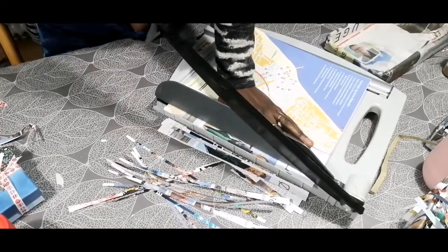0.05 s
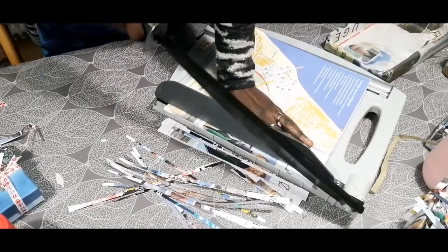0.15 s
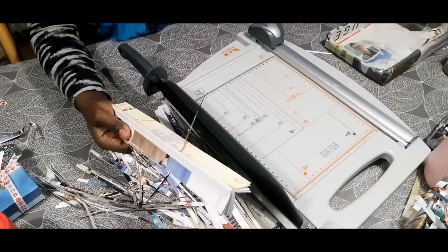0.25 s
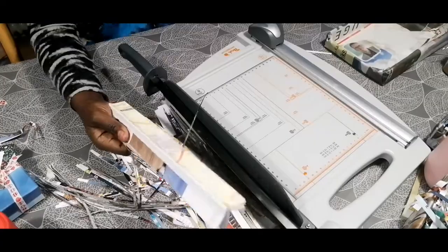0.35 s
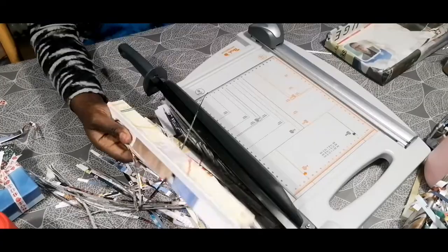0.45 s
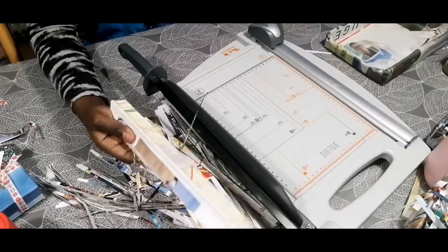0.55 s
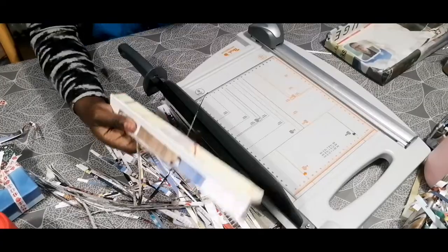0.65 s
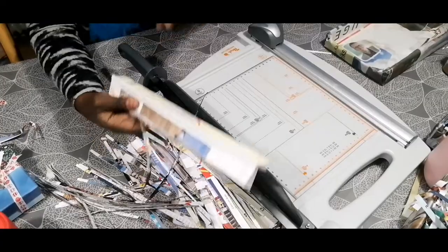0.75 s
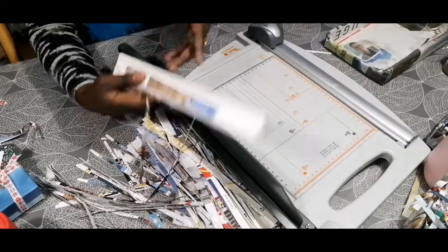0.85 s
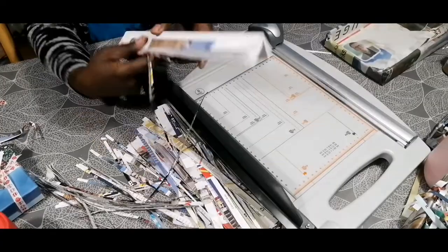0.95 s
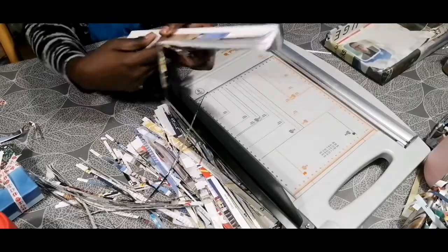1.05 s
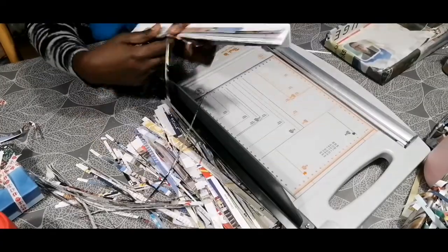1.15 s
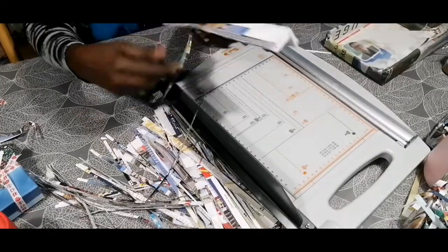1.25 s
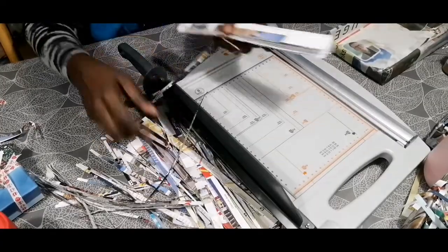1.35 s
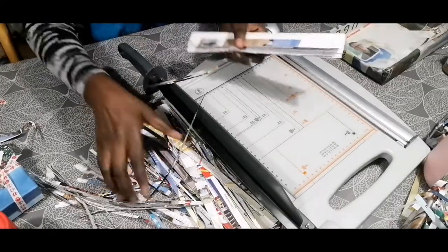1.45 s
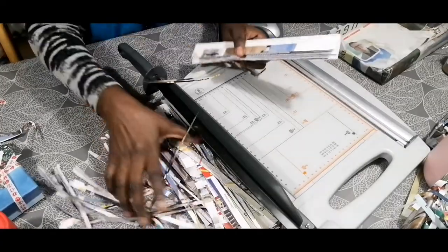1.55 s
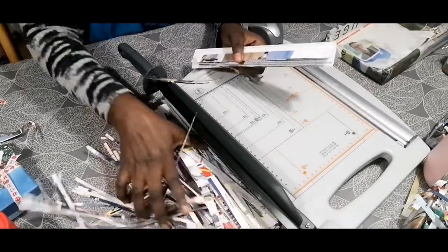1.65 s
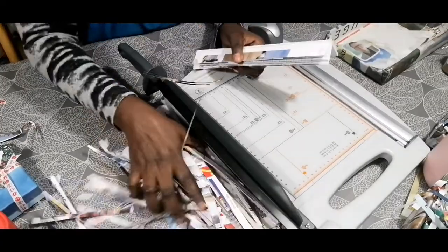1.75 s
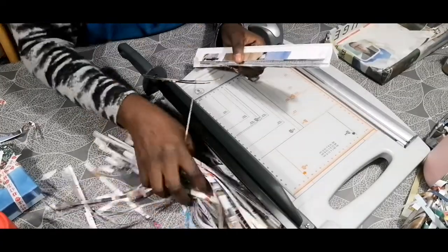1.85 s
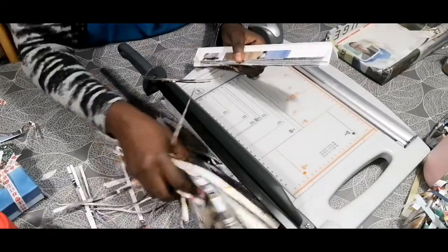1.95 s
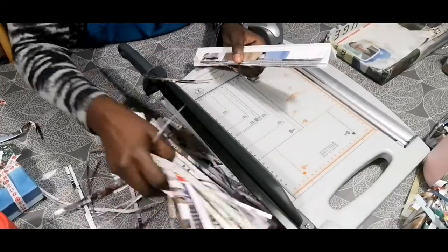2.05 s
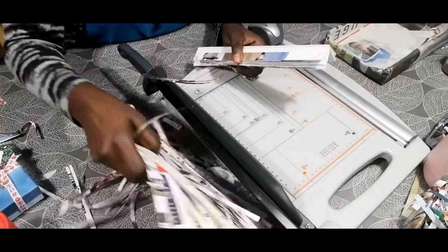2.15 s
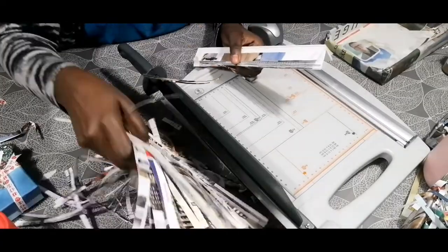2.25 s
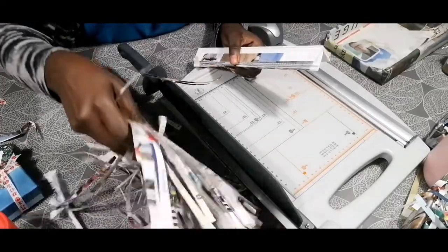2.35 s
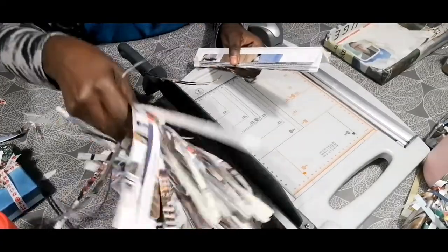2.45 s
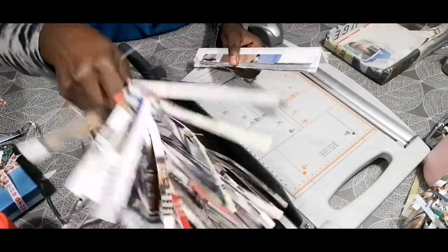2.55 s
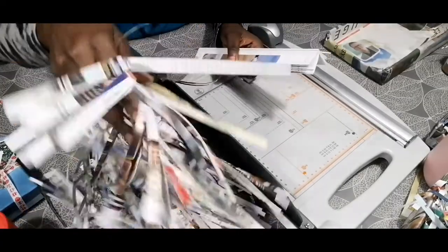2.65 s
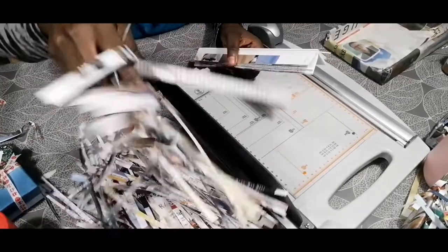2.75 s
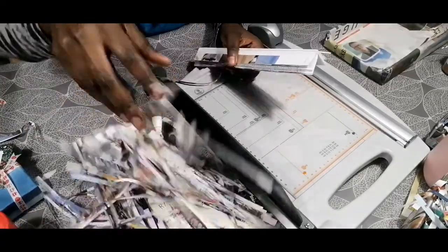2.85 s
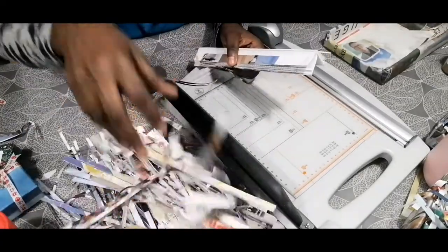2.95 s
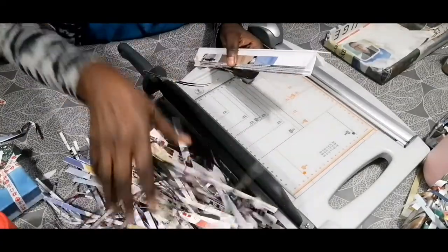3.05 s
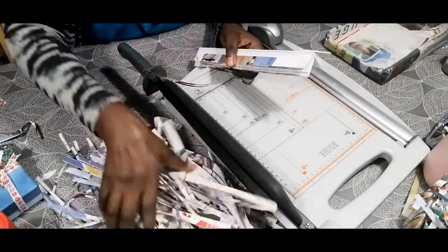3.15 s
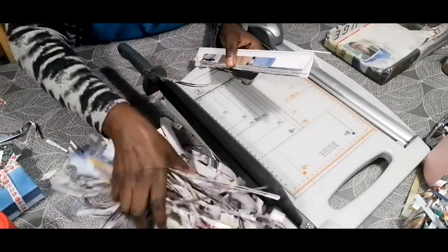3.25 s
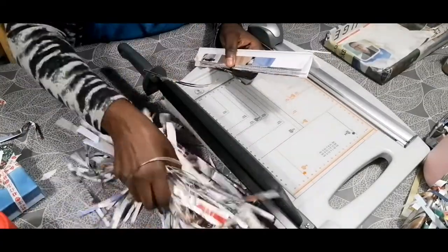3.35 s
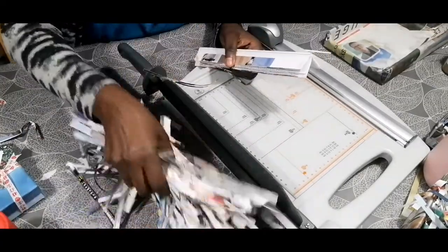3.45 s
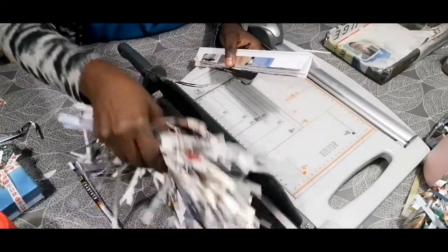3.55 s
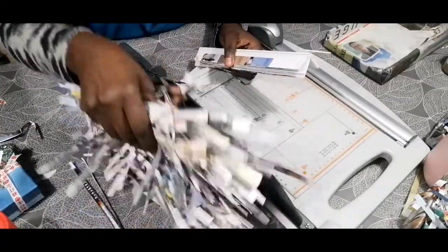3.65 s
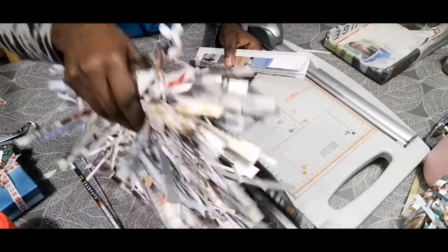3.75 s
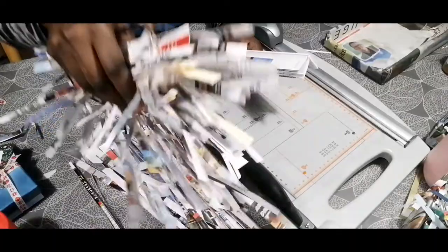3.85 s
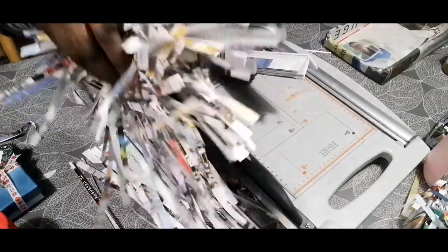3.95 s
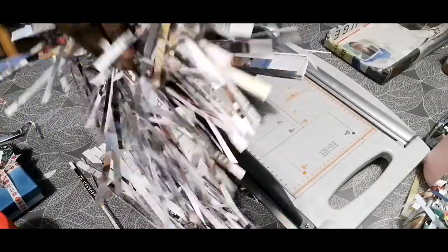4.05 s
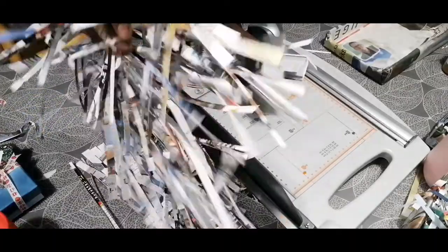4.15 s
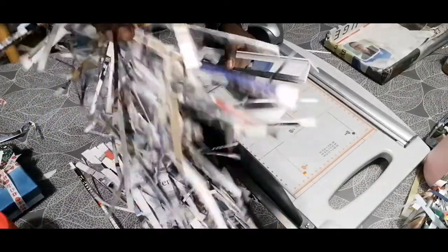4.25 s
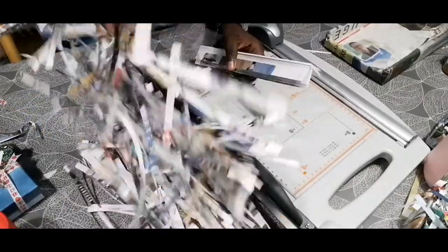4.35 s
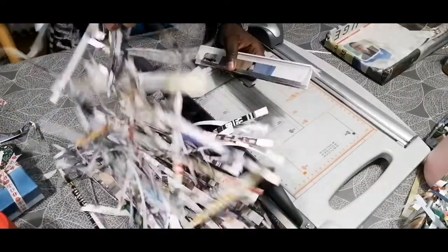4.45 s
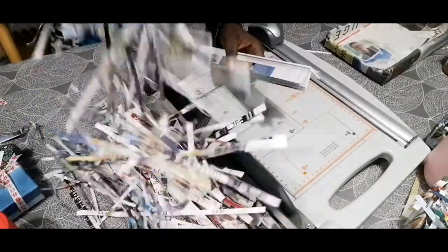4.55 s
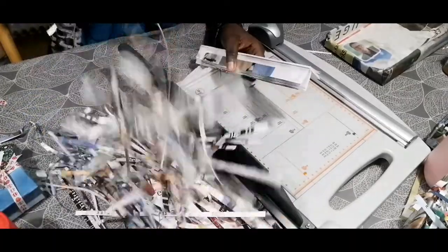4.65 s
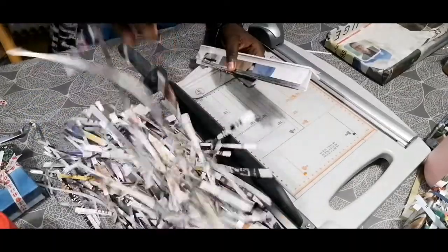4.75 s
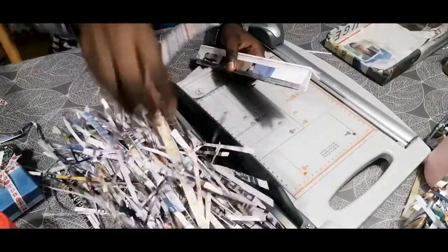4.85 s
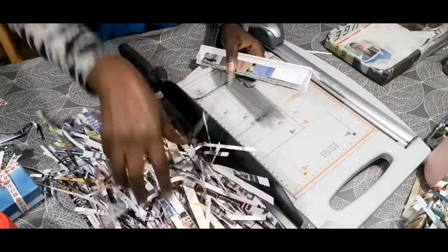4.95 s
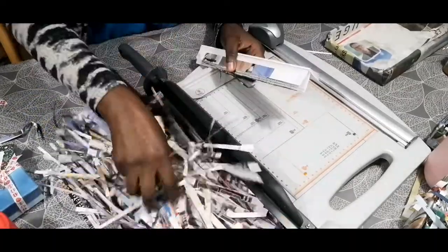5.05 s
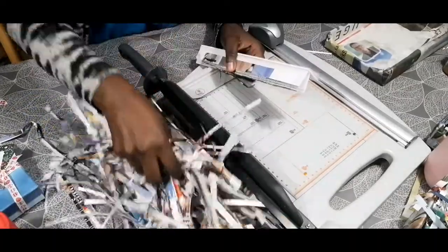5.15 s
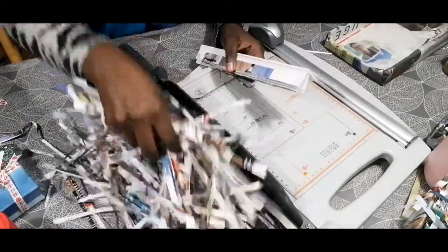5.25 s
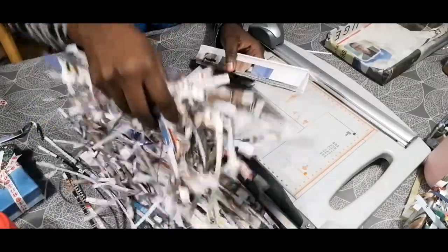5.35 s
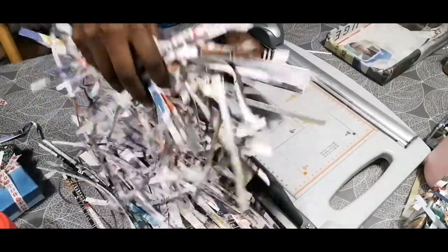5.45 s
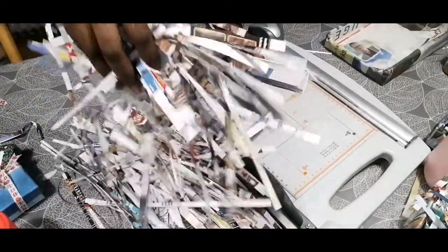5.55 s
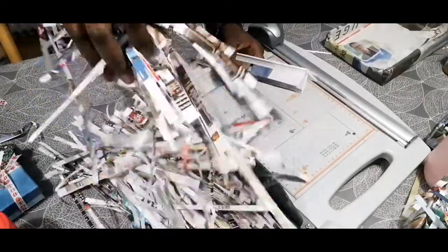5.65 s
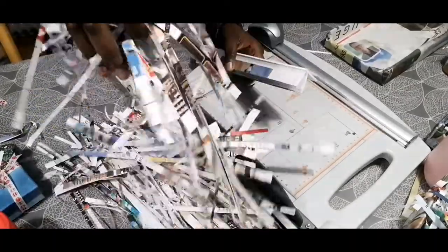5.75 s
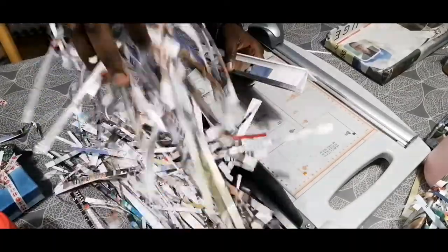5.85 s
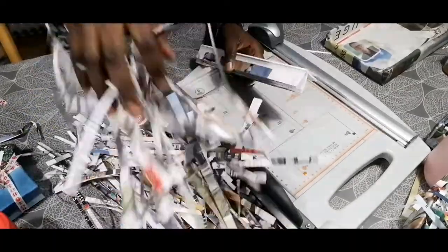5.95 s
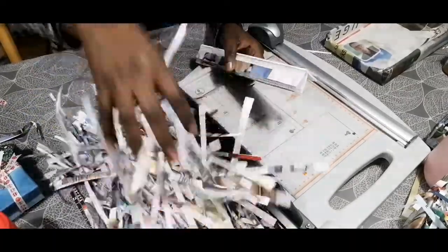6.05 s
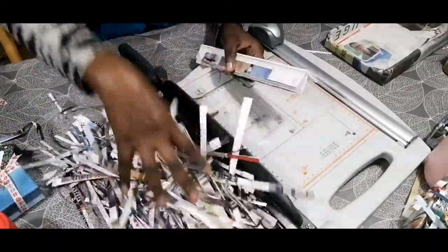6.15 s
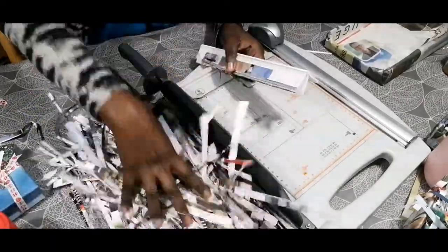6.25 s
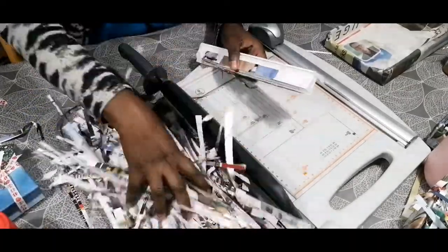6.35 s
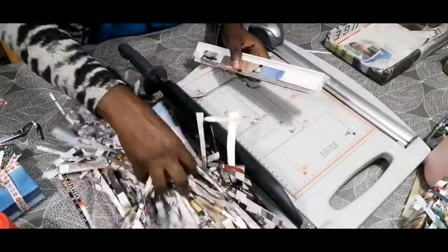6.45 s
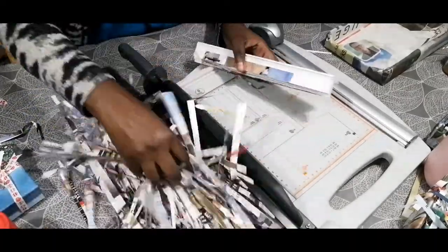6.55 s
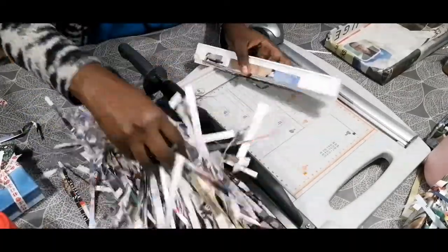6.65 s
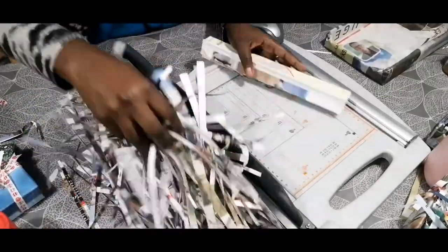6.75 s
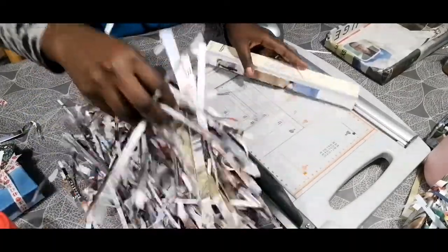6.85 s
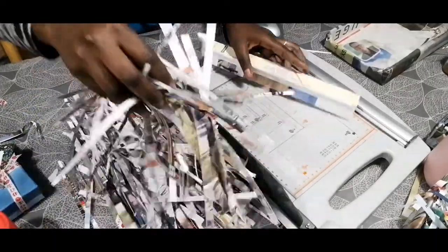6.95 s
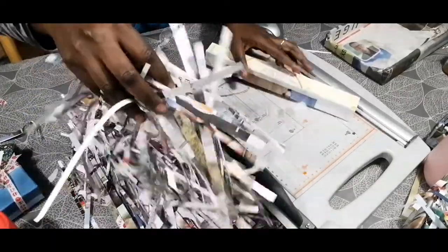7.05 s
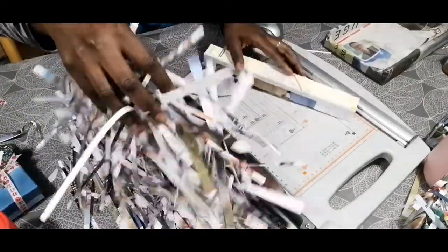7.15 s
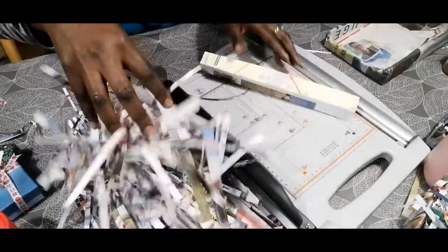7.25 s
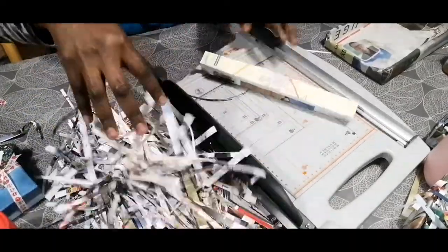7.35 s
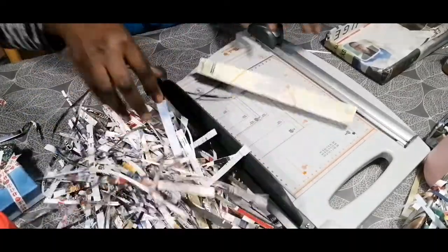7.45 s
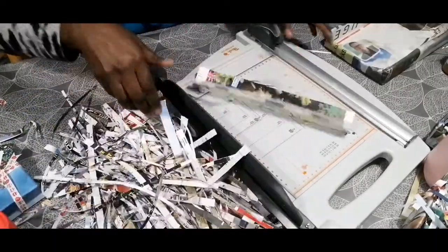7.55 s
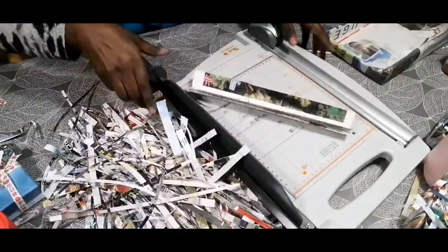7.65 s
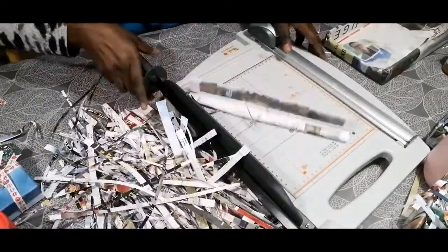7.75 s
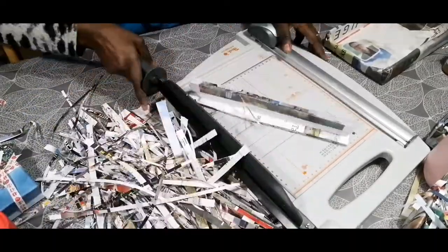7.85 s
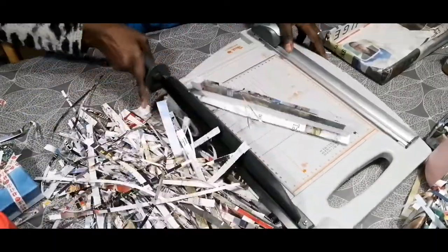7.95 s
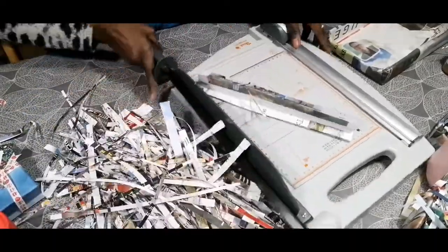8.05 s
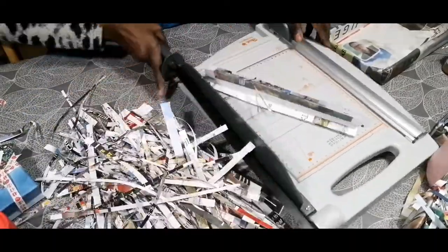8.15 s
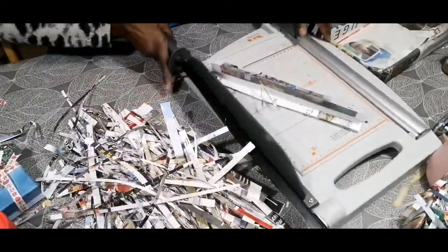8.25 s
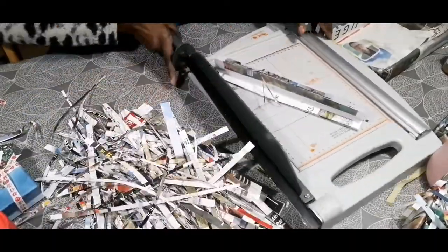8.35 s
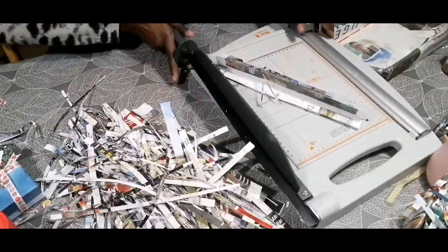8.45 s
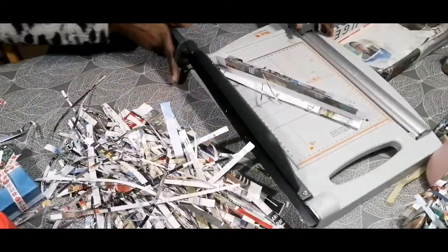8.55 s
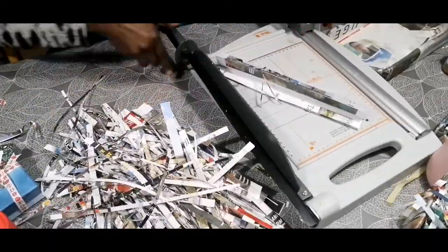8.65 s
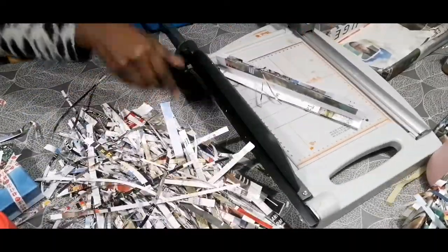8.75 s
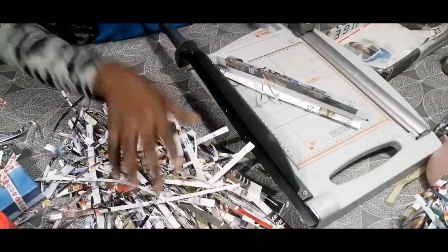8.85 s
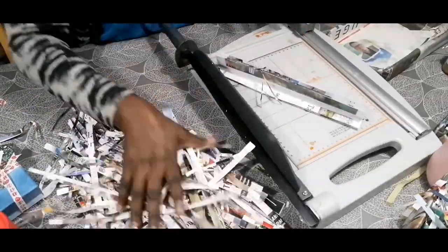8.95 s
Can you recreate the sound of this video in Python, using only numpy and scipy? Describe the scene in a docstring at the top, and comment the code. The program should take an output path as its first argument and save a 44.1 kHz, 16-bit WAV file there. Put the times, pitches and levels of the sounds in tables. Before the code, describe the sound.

A lever paper cutter crunches through a stack of magazine pages in one short, juddering stroke. Pages shift and a hand bumps the table. The cut strips are then gathered, lifted and dropped in repeated handfuls, with bright crinkling, sharp cracks and soft taps. Near the end the cutter is knocked and rings briefly, and a bundle of pages slaps down and slides. It is heard close up in a small, quiet room.

```python
"""A lever paper cutter on a cloth-covered table in a small room. First the blade shears a stack of
magazine pages: fibres tear, slips and jerks shake the bed. Pages shift; a hand bumps the table.
From 1.5 s the offcut strips are gathered, lifted and dropped in handfuls, buckling in clicks,
rubbing, and landing with soft taps. At 7.5 s the cutter is knocked and rings; at 7.9 s a bundle
of pages slaps onto its bed and slides. The paper gives sharp cracks throughout."""
import sys
import numpy as np
from scipy import signal
from scipy.fft import rfft, irfft
from scipy.io import wavfile

SR = 44100
rng = np.random.default_rng(int(sys.argv[2]) if len(sys.argv) > 2 else 0)


def int16_out(signal):
    """Quantize to a 16-bit WAV file."""
    q = np.round(np.clip(np.atleast_2d(signal).T, -1, 1) * 32767)
    wavfile.write(sys.argv[1], SR, q.astype(np.int16))


N = 397341
TIME = np.arange(N) / SR


# cutter bed and arm modes: f/Hz, level/dB, t60/s
CUTTER_MODES = [(110.8, -2.5, 0.45), (152, 2, 0.32), (198, -3, 0.43), (270.2, 0, 1), (317.4, 1.5, 0.047),
                (376.7, 4, 0.58), (413, -8, 0.87), (493, -22, .2), (551, -15, 0.9), (601, -10, 0.34),
                (653, -8.5, 0.34), (715, -2.5, 0.2), (756, -8, 0.26), (876, -7, 0.22), (941, -3, 0.5),
                (987, -4.5, 0.057), (1147, -7, 0.2), (1194, -3.5, 0.2), (1390, -16, .3), (1993, -9, 0.1)]
# blade in the stack: t/s, judder/dB, tearing/dB
BLADE_STROKE = [(0.08, -41.5, -54.5), (0.124, -39, -55), (0.2, -36, -50.5), (0.26, -33, -44.5),
                (0.33, -29.5, -49.5), (0.39, -30, -40.5), (0.47, -30.5, -54)]
# blade jerks through a few sheets: t/s, level/dB, low/Hz, high/Hz, t60 factor
BLADE_JERKS = [(0.07, -42, 330, 870, .5), (0.124, -31, 130, 448, 0.3), (0.158, -36.5, 400, 1300, .15),
               (0.186, -34, 650, 1020, .12), (.209, -42, 130, 400, .2), (0.23, -34, 403, 1210, .15),
               (0.273, -31, 130, 500, .2), (0.310, -23, 170, 1200, 0.12), (.333, -30.5, 130, 420, .15),
               (.367, -24, 220, 1010, .2), (0.4, -26.5, 150, 1000, .12), (0.408, -18, 220, 500, 0.13),
               (0.433, -20.5, 188.7, 426, 0.18), (0.454, -31.5, 200, 500, .15)]
# tearing fibres: f/Hz, level/dB
TEAR_SPECTRUM = [(300, 1.5), (1200, -2.5), (2200, 0.5), (3500, -0.5), (5500, -3), (7500, -14), (10000, -9),
                 (15000, -20)]

def shear():
    """Fibres part under the blade in slips and jerks that shake the cutter."""
    start_s, stop_s = .071, .480
    judder, tearing = gains(BLADE_STROKE)
    sounding = (TIME > start_s) & (TIME < stop_s)
    slips = grains(per_s=860, spread_db=1.5, clump_db=-.5, clump_hz=130)
    slips = sounding * judder * butter(slips, 2500, "low", order=1)
    jerks = sum(placed(s, amp(db) * blow(CUTTER_MODES, *shape, scuff=.18, crowd_db=-4.5, crowd_hz=1100))
                for s, db, *shape in BLADE_JERKS)
    bed = modal_response(CUTTER_MODES, t60_factor=.14, vary_db=2)   # damped by the paper stack under the blade
    shake = butter(amp(-29) * convolve(slips, bed) + jerks, 80, "high")   # small bed: no deep bass
    fibres = grains(per_s=2000, spread_db=-1.5, clump_db=5, clump_hz=170)
    fibres = sounding * tearing * colour(fibres, TEAR_SPECTRUM)
    until_stop = np.clip((stop_s - TIME) / .0015 + 1, 0, 1)   # the sound breaks off abruptly to a faint tail
    shake = pan(room(shake, wet_db=-6), left_db=-2.5) * np.maximum(until_stop, amp(-31.5))
    fibres = pan(room(amp(9.5) * fibres, wet_db=-1.5), left_db=2.5) * np.maximum(until_stop, amp(-6.5))
    return shake + fibres


# strips raked, lifted, dropped: t/s, swell/s, hold/s, crinkle/dB, fade/(dB/s), slide re crinkle/dB
STRIP_MOVES = [(1.48, 0.026, 0.09, -50, 65, -26.5), (1.58, 0.24, 0.081, -41, 40, -4.5),
               (2.20, 0.094, 0.059, -50.5, 40, -10), (2.38, 0.15, 0.17, -45, 90, -7.5),
               (2.855, 0.013, 0.028, -46, 66, -4), (3.16, 0.025, 0.099, -43.5, 48, -9),
               (3.27, 0.046, 0.071, -41, 166, -2), (3.40, 0.1, 0.064, -50.5, 7.5, -8),
               (4.05, 0.15, 0.31, -49.5, 74.5, -10), (4.30, 0.058, 0.035, -43, 52.5, -4.5),
               (4.66, 0.037, 0.049, -43.5, 179, -9), (4.98, 0.028, 0.034, -39.5, 28, -9),
               (5.63, 0.037, 0.01, -51, 17.5, -5.5), (5.98, 0.1, 0.02, -44, 122, -6),
               (6.245, 0.02, 0.024, -42, 79, -8.5), (6.38, 0.056, .03, -43, 20, -6.5),
               (7.04, 0.12, 0.062, -50.5, 78, -7.5), (7.19, 0.085, 0.05, -48, 79, -9),
               (8.89, 0.037, 0.031, -45.5, 156, -10.5)]
# a bunch buckles at once: t/s, hold/s, crinkle/dB, slide re crinkle/dB
STRIP_CRUNCHES = [(1.796, 0.025, -44, -15), (1.895, .02, -45, -9), (1.95, 0.039, -45, -12),
                  (2.067, 0.11, -46.5, -23), (2.934, 0.025, -47, -4), (3.197, 0.023, -51, -1),
                  (3.376, 0.021, -55, -4), (4.363, 0.018, -52, 1), (4.77, 0.025, -45.5, -6),
                  (5.065, 0.02, -44.5, 2), (5.6, 0.038, -52, -17), (6.094, 0.025, -48, -16.5),
                  (6.312, 0.011, -51, 3), (6.452, .03, -42.5, -11), (6.81, 0.085, -50.5, -11),
                  (7.274, 0.012, -51, -1), (7.307, 0.029, -49, -5)]
# flat pages shift: t/s, swell/s, hold/s, crinkle/dB, fade/(dB/s), slide re crinkle/dB
PAGE_MOVES = [(.48, 0.0034, 0.0053, -52.5, 57, -13), (.60, 0.29, 0.12, -50.5, 21, -10.5),
              (1.05, 0.007, 0.0075, -66, 106, 20), (1.20, 0.006, 0.0073, -40.5, 142, -25),
              (7.735, 0.014, 0.11, -51, 214, -4.5), (7.895, 0.0063, 0.0082, -38.5, 221, 3),
              (7.92, 0.047, 0.33, -44, 62, -6.5), (8.58, 0.008, 0.018, -66, 94, -11.5)]
# where the hands work: t/s, left minus right/dB
HAND_PAN = [(.5, 2.5), (.85, 4), (2.65, 3), (3.25, -0.5), (4.0, 2), (5.07, 1), (6.0, 2), (8.3, 3),
            (9.0, 4.5)]
# buckling paper: f/Hz, level/dB
CRINKLE_SPECTRUM = [(800, -8.5), (2000, -15.5), (3500, 4), (5200, 5.5), (7000, 1), (10000, 3.5),
                    (13000, -4), (15500, -7.5)]
# paper on paper: f/Hz, level/dB
SLIDE_SPECTRUM = [(300, -11.5), (900, -1), (1500, -1), (3000, 3.5), (4500, -1), (9000, -16.5)]

def rustle():
    """Paper buckles in tiny clicks and rubs on itself; narrow strips sound brighter than flat pages."""
    crunch_swell_s, crunch_fade_db_per_s = .0017, 507
    strip_treble_db, page_treble_db = 4, -14
    crunches = [(s, crunch_swell_s, hold_s, db, crunch_fade_db_per_s, slide_db)
                for s, hold_s, db, slide_db in STRIP_CRUNCHES]
    strips, pages = handling(STRIP_MOVES + crunches), handling(PAGE_MOVES)
    crinkle, slide = np.hypot(strips, pages)
    strip_share = strips[0] ** 2 / (crinkle ** 2 + 1e-20)
    treble = amp(page_treble_db + strip_share * (strip_treble_db - page_treble_db))
    grip = amp(2 * drift(85))   # the handful catches and gives way as a whole
    heap = 0
    for place in np.linspace(-1, 1, 4):   # left to right
        clicks = colour(grains(per_s=900, spread_db=1, clump_db=4, clump_hz=120), CRINKLE_SPECTRUM)
        rubs = colour(grains(per_s=1800, spread_db=4, clump_db=5.5, clump_hz=90), SLIDE_SPECTRUM)
        kinks = butter(grains(per_s=13, spread_db=1.5, clump_db=-3.5, clump_hz=10), [2000, 9000], "band")
        paper = grip * (amp(-9.5) * crinkle * clicks + amp(-5.5) * slide * rubs)[0]
        paper += amp(-21) * crinkle * kinks
        lag_samples = int(place * 7)
        stereo = np.array([np.roll(paper, lag_samples), paper])
        heap = heap + room(pan(stereo, left_db=-4 * place), wet_db=-2)
    dull = butter(heap, 3800, "low", order=1)
    lean, = gains(HAND_PAN)
    return (dull + treble * (heap - dull)) * np.sqrt([lean, 1 / lean])


# sharp cracks of paper: t/s, level/dB, mids re treble/dB, left minus right/dB
PAPER_CRACKS = [(0.1875, -31, 6.5, 4), (0.312, -27, 17, 4), (.436, -44, -5, 2), (.454, -35, -15, 4),
                (0.8898, -36, 5.5, 7), (.987, -41.5, -22, 17), (1.2087, -25, 3.5, 2), (1.497, -44, 19, 8),
                (1.795, -38, -12.5, 0), (1.8412, -26.5, 2, 0), (1.938, -26, 9, 5), (1.973, -26, -17.5, 0),
                (2.54, -32.5, 20, 5), (2.589, -17, 12, 1), (2.683, -35, 11, 2), (2.896, -28.5, -5, 12),
                (2.9143, -23.5, -30, -3), (3.019, -35, -10, 2), (3.594, -30, -27, 10),
                (4.0671, -36, -3.5, 5), (4.2137, -32.5, -28.5, -8.5), (4.986, -47, -11, 4),
                (5.256, -34.5, -10, -4), (5.6572, -36.5, -17, -14.5), (5.8382, -40.5, -9, 4.5),
                (5.8804, -36.5, -3, -13), (6.171, -32, -22.5, 10), (6.271, -32, -5, 2),
                (6.9973, -34, -27, 10), (7.2609, -27, -23, 13), (7.526, -36.5, -11, 1),
                (7.798, -36.5, 6.5, 0), (7.8968, -23, -10, 8), (8.261, -29.5, -12, 3),
                (8.589, -48, -15.5, 1)]

def cracks():
    """Paper being cut, handled or slapped down gives a sharp crack and a brief shiver."""
    crack_fade_s, shiver_fade_s, shiver_db = .0007, .003, -12
    t, out = TIME[:SR // 50], 0
    envelope = np.exp(-t / crack_fade_s) + amp(shiver_db) * np.exp(-t / shiver_fade_s)
    for s, db, mids_db, left_db in PAPER_CRACKS:
        burst = envelope * (rng.choice([-1, 1], len(t)) + .7 * rng.choice([-1, 1], (2, len(t))))
        crack = butter(burst, [3300, 8800], "band") + amp(mids_db) * butter(burst, [2300, 3800], "band")
        out = out + pan(np.array([placed(s, amp(db) * unit(side)) for side in crack]), left_db)
    return amp(-18) * room(out, wet_db=-7)


# knocks on the cutter: t/s, level/dB, low/Hz, high/Hz, t60 factor
CUTTER_KNOCKS = [(1.287, -49, 310, 777, 0.6), (1.691, -53, 330, 940, .7), (5.021, -42.5, 290, 620, 0.31),
                 (7.523, -32, 464, 970, 0.43), (7.529, -33, 225, 330, 1), (7.564, -33, 235, 380, 0.72),
                 (7.606, -42, 330, 1000, 1), (7.81, -47, 503, 1200, 0.34), (7.91, -37, 244, 2000, 0.55),
                 (7.976, -44.5, 350, 890, 0.47), (8.270, -47.5, 305, 910, 0.28)]

def knocks():
    """The cutter rings with the colour of the struck spot."""
    sound = sum(placed(s, amp(db) * blow(CUTTER_MODES, *shape, scuff=.34, crowd_db=3, crowd_hz=1240))
                for s, db, *shape in CUTTER_KNOCKS)
    return pan(room(amp(1) * sound, wet_db=-8.5), left_db=-3.5)


# table top modes: f/Hz, level/dB, t60/s
TABLE_MODES = [(81.5, 4, 0.26), (94.7, 1.5, 1), (119.4, 9, 0.54), (159.6, -3, 0.59), (204.5, -4.5, 0.56),
               (298, -7, 0.5), (326, -14, 0.43), (377.3, -1, 0.74), (598, -13, .5), (640.5, 1.5, 0.55),
               (686, -18, 0.55)]
# hands and paper bump the table: t/s, level/dB, low/Hz, high/Hz, t60 factor, left minus right/dB
TABLE_THUDS = [(0.581, -57.5, 80, 198, 0.84, 4.5), (1.056, -40, 150, 370, 0.85, 5),
               (1.073, -28, 61.6, 150, 0.33, 2.5), (1.15, -36.5, 74.5, 130, 0.13, 2),
               (3.180, -44.5, 78, 250, 0.61, -6), (5.018, -36, 111, 355, 0.57, -5.5),
               (6.307, -55, 70, 200, 0.25, 3), (7.858, -32, 144, 225, 0.13, 9.5)]

def thuds():
    """Soft blows on the table; a hand that stays down shortens the ring."""
    sound = 0
    for s, db, *shape, left_db in TABLE_THUDS:
        thud = blow(TABLE_MODES, *shape, scuff=.26, crowd_db=6, crowd_hz=480, order=1)
        sound = sound + pan(placed(s, amp(db) * thud), left_db)
    return room(sound, wet_db=-5.5)


# flat paper lands: t/s, level/dB, fade/s, low/Hz, high/Hz
PAGE_SLAPS = [(1.061, -36.5, 0.052, 2850, 4680), (1.284, -53, 0.066, 840, 2920),
              (2.586, -43, 0.043, 2400, 4020), (5.013, -48, 0.06, 722, 2560),
              (6.313, -38, 0.01, 1180, 3550), (7.527, -41, 0.042, 686, 2220),
              (7.896, -31, 0.0072, 4480, 11200), (7.911, -32.5, 0.016, 1144, 2700)]

def slaps():
    """Landing sheets merge into a quickly fading burst of noise."""
    t, sound = TIME[:SR // 4], 0
    for s, db, fade_s, *band_hz in PAGE_SLAPS:
        patter = unit(butter(rng.standard_normal(len(t)), band_hz, "band"))
        sound = sound + placed(s, amp(db) * np.exp(-t / fade_s) * patter)
    return room(sound, wet_db=-2.5)


# bunches and fingertips land: t/s, level/dB, low/Hz, high/Hz
HEAP_TAPS = [(2.994, -49.5, 385, 1110), (4.334, -53, 298, 1100), (4.505, -45.5, 443, 1180),
             (4.527, -51.5, 212, 307), (4.593, -47.5, 545, 1020), (4.72, -54, 506, 910),
             (6.318, -51, 397, 1290), (6.801, -47.5, 220, 1000), (7.113, -60, 456, 900),
             (7.242, -49.5, 284, 680)]

def taps():
    """Soft landings on the heap, which smothers the ring of the bed."""
    sound = 0
    for s, db, *band_hz in HEAP_TAPS:
        tap = blow(CUTTER_MODES, *band_hz, t60_factor=.35, scuff=.59, crowd_db=8, crowd_hz=1331)
        sound = sound + placed(s, amp(db) * tap)
    return pan(room(amp(-1) * sound, wet_db=-6), left_db=-5)


# paper dragged: t/s, swell/s, hold/s, level/dB, fade/(dB/s)
DRAG_MOVES = [(0.647, 0.2, 0.011, -62.5, 83), (1.568, 0.053, 0.044, -61, 65), (2.504, 0.11, 0.55, -73, 3.5),
              (2.87, .02, .08, -73, 143), (3.24, 0.017, 0.037, -67.5, 66.5), (4.238, 0.25, 0.13, -61, 60.5),
              (5.017, 0.036, 0.08, -64.5, 34.5), (5.66, 0.021, .03, -63.5, 96),
              (6.298, 0.38, 0.071, -64, 13), (7.698, 0.25, 0.29, -52.5, 61)]
# paper on cloth and bed: f/Hz, level/dB
BRUSH_SPECTRUM = [(50, 2), (110, 4.5), (200, -0.5), (370, 4), (500, -5), (680, -5), (1000, -5.5),
                  (1600, -17.5), (4000, -64)]

def drag():
    """Paper catches on the cloth and the bed: a low, dull brushing."""
    pressure = power_sum([amp(db) * effort(*timing, fade) for *timing, db, fade in DRAG_MOVES])
    catches = grains(per_s=5400, spread_db=-.5, clump_db=3.5, clump_hz=37)
    brushing = pressure * colour(catches, BRUSH_SPECTRUM)
    return pan(room(amp(4.5) * brushing, wet_db=.5), left_db=-6)


# room noise: f/Hz, level/dB
HUSH_SPECTRUM = [(25, 0), (125, -6), (300, -10), (400, -13), (900, -19), (2000, -22), (4300, -26),
                 (7000, -29), (15000, -28)]

def hush():
    """Faint steady noise, partly alike on both sides."""
    air = rng.standard_normal(N) + rng.standard_normal((2, N)) / 2
    return amp(-71) * colour(air, HUSH_SPECTRUM)


# reverberation: f/Hz, t60/s
ROOM_DECAY = [(200, 0.24), (1000, 0.32), (4000, 0.23), (15000, 0.24)]

def room(x, wet_db):
    """Direct sound plus a diffuse stereo tail, longest near 1 kHz."""
    t, edges_hz = TIME[:SR // 2], np.geomspace(420, 19000, 9)
    white, tail = rng.standard_normal((2, len(t))), 0
    for k, (low, high) in enumerate(zip(edges_hz, edges_hz[1:])):
        t60_s = at_hz(ROOM_DECAY, np.sqrt(low * high))
        tail = tail + (-1) ** k * butter(white, [low, high], "band") * amp(-60 * t / t60_s)
    tail = unit(tail * np.clip(t / .0032, 0, 1)) / np.sqrt(len(t))
    return (x + amp(wet_db) * convolve(x, tail)) / np.hypot(1, amp(wet_db))


def blow(modes, low_hz, high_hz, t60_factor, scuff, crowd_db, crowd_hz, order=2):
    """A blow rings the clear modes and a crowd of weak ones within a band; rms 1 over the first 30 ms."""
    ring = convolve(contact(scuff), modal_response(modes, t60_factor, vary_db=5.1))[0]
    crowd = unit(butter(rng.standard_normal(SR), [crowd_hz / 7, crowd_hz], "band", order=3))
    crowd_fade_s = .053 * np.sqrt(t60_factor)
    crowd *= amp(crowd_db) * np.exp(-TIME[:SR] / crowd_fade_s)
    sound = butter(ring + crowd[:len(ring)], [low_hz, high_hz], "band", order)
    return sound / np.std(sound[:int(.03 * SR)])


def contact(scuff):
    """Force of a blow: a pulse, then a brief scuff as the surfaces settle."""
    t = TIME[:SR // 10]
    force = scuff * rng.standard_normal(len(t)) * np.exp(-t / .019) / np.sqrt(SR / 100)
    force[0] = 1
    return force


def modal_response(modes, t60_factor, vary_db):
    """Decaying modes of alternating sign, weighted by a random struck spot."""
    t = TIME[:int(SR * np.clip(t60_factor, .3, 1) * .7)]
    spot_db = vary_db * rng.standard_normal(len(modes))
    return sum((-1) ** k * amp(db + spot_db[k] - 60 * t / (t60 * t60_factor)) * np.sin(2 * np.pi * hz * t)
               for k, (hz, db, t60) in enumerate(modes))


def grains(per_s, spread_db, clump_db, clump_hz):
    """Random clicks of uneven size, in clumps; rms 1."""
    sizes = amp(spread_db * np.minimum(rng.exponential(1, N), 4)) * rng.choice([-1, 1], N)
    return unit(sizes * (rng.random(N) < per_s / SR) * amp(clump_db * drift(clump_hz)))


def drift(rate_hz):
    """Straight lines between normal random values."""
    return np.interp(TIME * rate_hz, np.arange(N // 50), rng.standard_normal(N // 50))


def handling(moves):
    """Crinkle and slide gains for a table of moves."""
    crinkle, slide = [], []
    for *timing, db, fade, slide_db in moves:
        move = amp(db) * effort(*timing, fade)
        crinkle.append(move)
        slide.append(amp(slide_db) * move)
    return power_sum(crinkle), power_sum(slide)


def effort(start_s, swell_s, hold_s, fade_db_per_s):
    """A hand move swells, holds and fades; steps of about 1 ms."""
    t = TIME[::SR // 1000] - start_s
    return np.clip(t / swell_s, 0, 1) * amp(-fade_db_per_s * np.maximum(t - swell_s - hold_s, 0))


def power_sum(moves):
    """Overlapping moves add in power; gain per sample."""
    return np.interp(TIME, TIME[::SR // 1000], np.sqrt(np.sum(np.square(moves), axis=0)))


def amp(db):
    """Decibels to gain."""
    return 10 ** (np.asarray(db) / 20)


def unit(x):
    """Scale to rms 1."""
    return x / np.sqrt(np.mean(x ** 2) + 1e-20)


def gains(rows):
    """Each dB column as a gain per sample."""
    s, *columns = np.transpose(rows)
    return [amp(np.interp(TIME, s, db)) for db in columns]


def at_hz(points, hz):
    """Read a table along log frequency."""
    f, value = np.transpose(points)
    return np.interp(np.log(hz + 1), np.log(f), value)


def butter(x, hz, kind, order=2):
    """Causal low-, high- or band-pass."""
    sos = signal.butter(order, np.clip(hz, 10, .45 * SR), kind, fs=SR, output="sos")
    return signal.sosfilt(sos, x + 1e-18)


def convolve(x, response):
    """Apply a mono or stereo impulse response."""
    return signal.oaconvolve(np.atleast_2d(x), np.atleast_2d(response), axes=-1)[:, :N]


def colour(x, spectrum, size=4096):
    """Minimum-phase filter of unit energy."""
    cepstrum = irfft(np.log(amp(at_hz(spectrum, np.fft.rfftfreq(size, 1 / SR)))))
    cepstrum[1:size // 2] *= 2
    cepstrum[size // 2 + 1:] = 0
    return convolve(x, unit(irfft(np.exp(rfft(cepstrum)))) / np.sqrt(size))


def placed(s, sound):
    """Set a short sound at its time."""
    return np.pad(sound, (round(s * SR), N))[:N]


def pan(x, left_db):
    """Lean a sound to one side."""
    return x * amp(np.array([[left_db], [-left_db]]) / 2)


def scene():
    """Cutter, table, paper and room noise."""
    cutter = shear() + knocks() + taps()
    left_lag_s = .00014   # the cutter stands to the right
    cutter[0] = np.interp(TIME - left_lag_s, TIME, cutter[0])
    return cutter + thuds() + rustle() + drag() + cracks() + slaps() + hush()


# microphone port peaks and dips, left then right: f/Hz, Q, gain/dB
PORT_PEAKS = [
    [(4000, 4.8, -5), (7060, 6.6, 16), (8300, 0.19, -4.5), (15190, 9, 6)],
    [(4120, 3.7, -9.5), (7470, 3.9, 13), (12400, 1.5, -6)],
]

def port(x, peaks):
    """A microphone port colours the treble."""
    for hz, q, db in peaks:
        w, g = 2 * np.pi * hz / SR, amp(db / 2)
        width = np.sin(w) / (2 * q)
        b = [1 + width * g, -2 * np.cos(w), 1 - width * g]
        a = [1 + width / g, -2 * np.cos(w), 1 - width / g]
        x = signal.lfilter(b, a, x)
    return x


def record(dry):
    """Two microphone ports, then a steep low-pass."""
    cutoff_hz = 15600
    heard = np.array([port(x, peaks) for x, peaks in zip(dry, PORT_PEAKS)])
    return signal.sosfilt(signal.ellip(10, .2, 80, cutoff_hz, fs=SR, output="sos"), heard)


dry = scene()
out = record(dry)
int16_out(out)
```